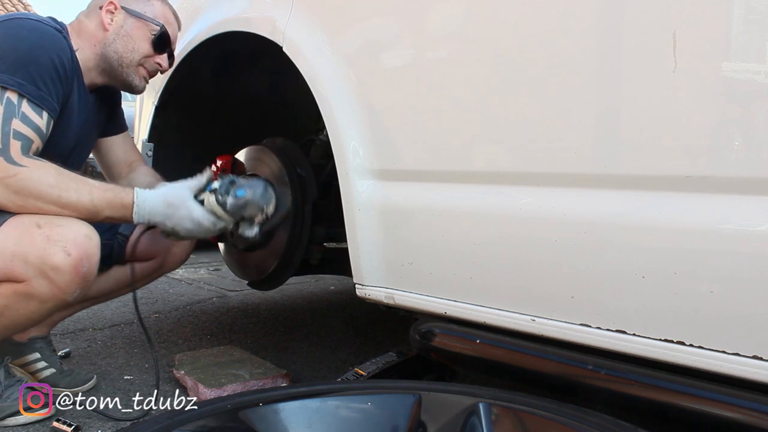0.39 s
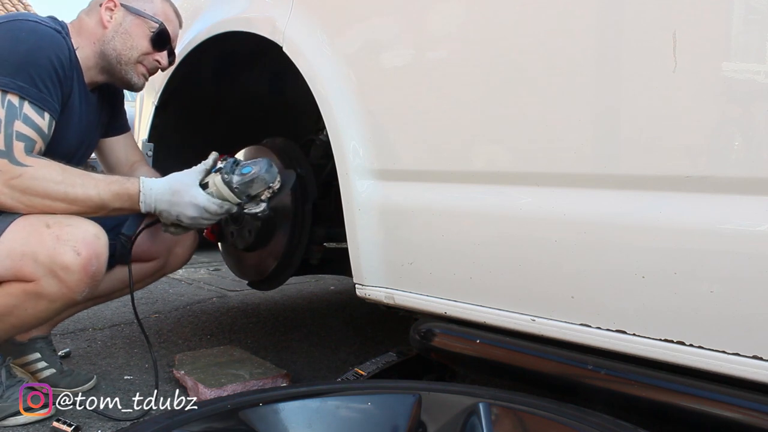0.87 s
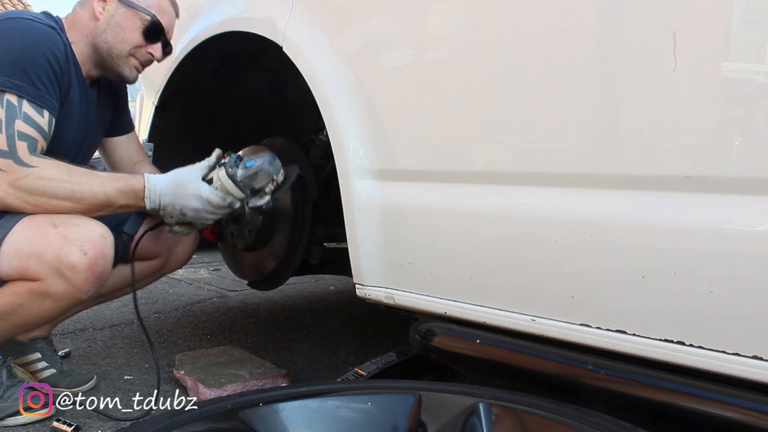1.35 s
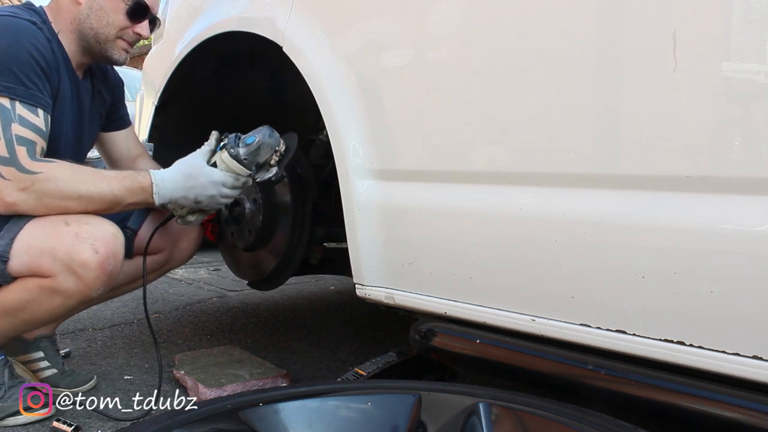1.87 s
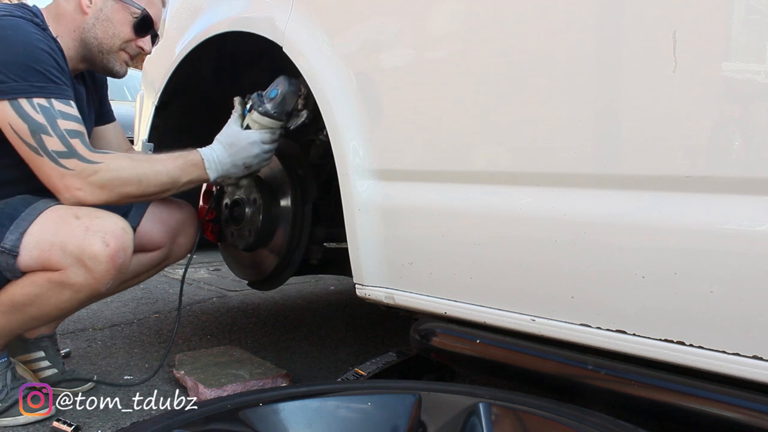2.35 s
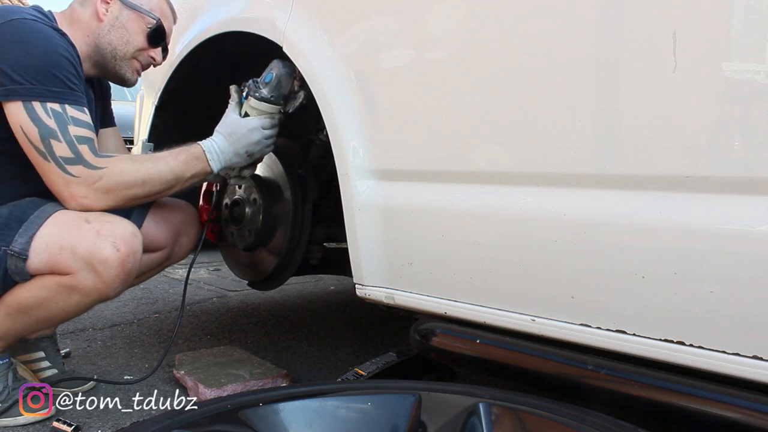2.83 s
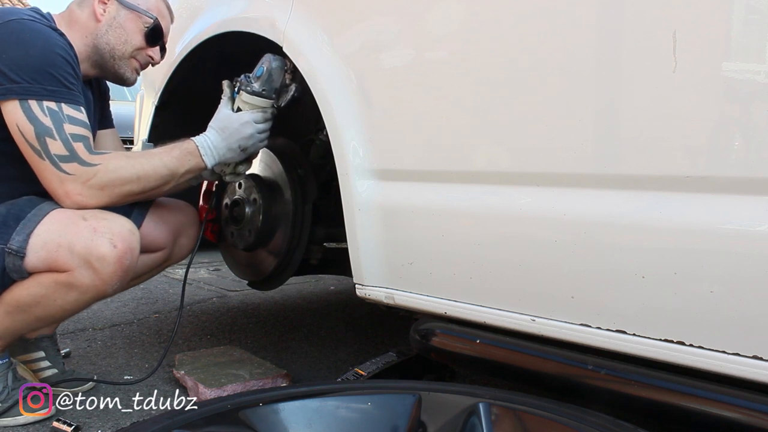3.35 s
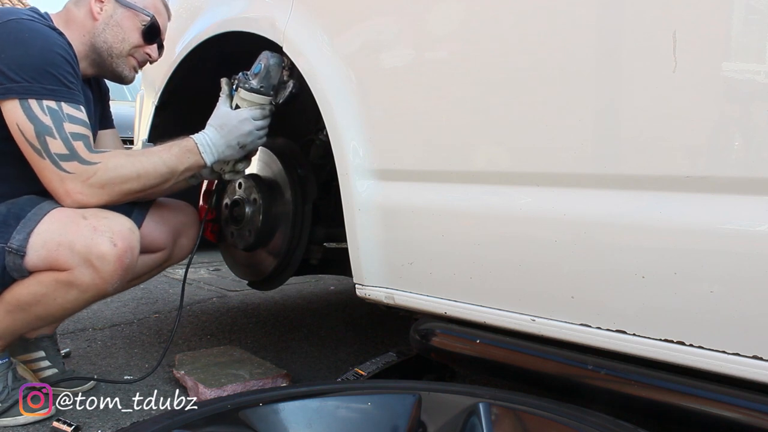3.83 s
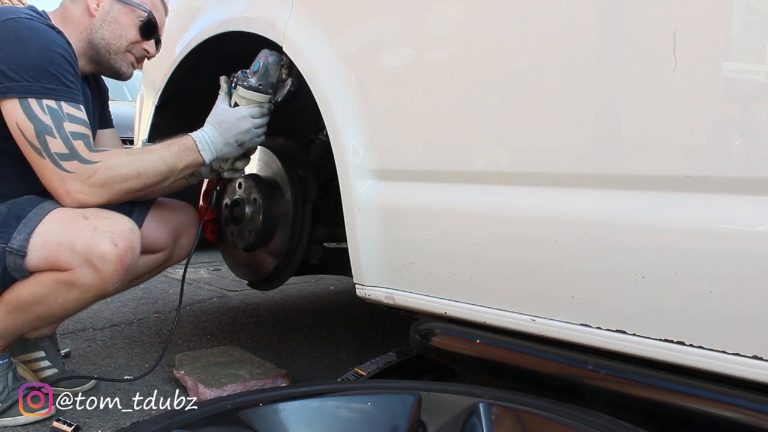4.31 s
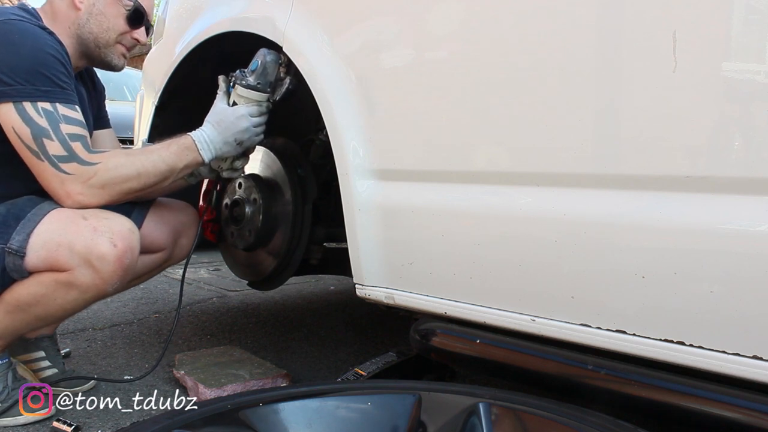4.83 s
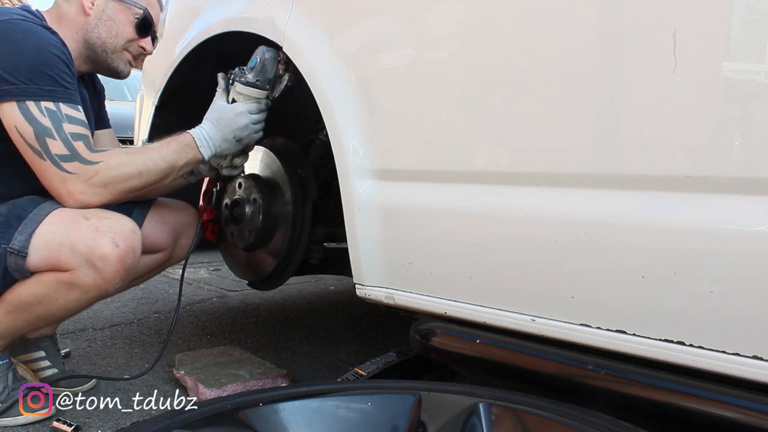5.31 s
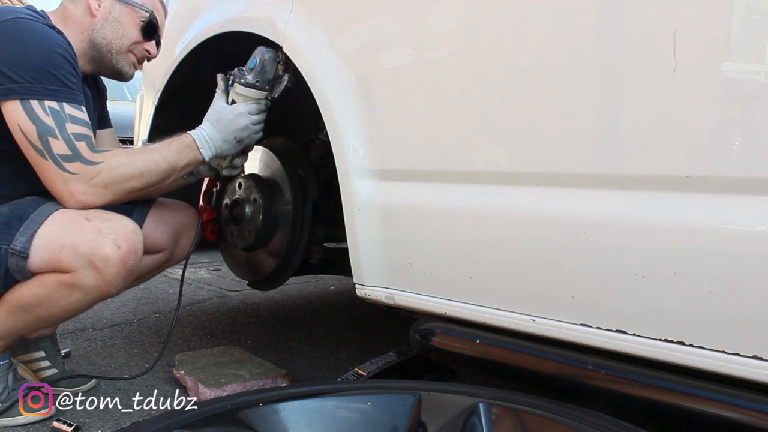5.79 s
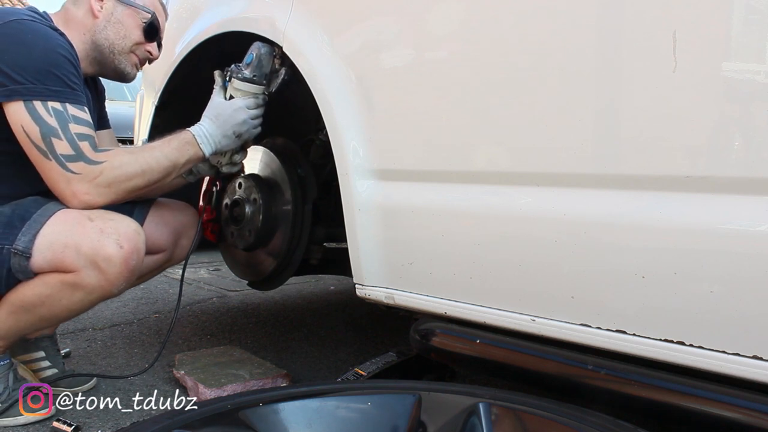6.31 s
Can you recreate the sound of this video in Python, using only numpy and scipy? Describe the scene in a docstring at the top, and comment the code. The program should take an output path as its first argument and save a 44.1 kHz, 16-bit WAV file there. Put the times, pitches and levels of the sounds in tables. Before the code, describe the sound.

A corded angle grinder, close and outdoors, begins already slowing, its gears rattling and metal guard ringing. It is switched on again, the whine and airy roar climbing fast to full speed. Then the disc bites into plastic wheel-arch lining: a harsh, steady scrape with gritty hiss and a hollow drumming buzz lasting to the end. Low wind gusts thump the microphone throughout.

```python
"""An angle grinder outdoors coasts down, its gears rattling and its steel guard ringing as slack teeth collide.
It is switched on at 1.59 s and winds up: tones locked to the shaft turns climb, and fan noise grows with speed.
From 3.42 s its disc bites into the plastic lining of a wheel arch: shaped noise scrapes, grit sprays and
the panel drums at multiples of the disc turns. Throughout, wind gusts buffet the microphone as low noise
and the loudest peaks overload it."""
import sys
import numpy as np
from scipy import signal
from scipy.fft import rfft, irfft, next_fast_len
from scipy.io import wavfile
from scipy.ndimage import uniform_filter1d, map_coordinates

SR = 44100
rng = np.random.default_rng(int(sys.argv[2]) if len(sys.argv) > 2 else 0)


def to_wav(s):
    """Save 16-bit WAV."""
    ch = np.atleast_2d(s).T  # columns
    pcm = np.round(np.clip(ch, -1, 1) * 32767)  # PCM
    wavfile.write(sys.argv[1], SR, pcm.astype(np.int16))


def natural_amplitude(level_db):
    """Convert a level in decibels to a linear amplitude factor, elementwise."""
    exponent = np.asarray(level_db, float) / 20
    return 10 ** exponent


N = 294147
T = np.arange(N) / SR  # time of each sample in seconds

CROWN_TEETH, PINION_TEETH = 37, 12  # bevel gears: crown on the disc shaft, pinion on the motor shaft
FULL_HZ = 5800  # gear mesh frequency taken as full speed
SWITCH_ON_S, TOUCH_S = 1.59, 3.42
# Brief dips of the clatter, followed in part by the fan noise.
# Each row: middle in seconds, half length in seconds, change in dB.
LULLS = [(.35, 0.086, -5.5), (.64, .03, -2.5), (.74, .03, -1.5), (.94, 0.037, -5.5), (1.51, 0.026, -1),
         (2.47, 0.072, -0.5)]


def unit(x):
    """Normalisation by mean power: scale to rms 1."""
    return x / np.sqrt(np.mean(x ** 2) + 1e-20)


def curves(rows):
    """Linear interpolation in time: one value per sample for each column after the time."""
    s, *cols = np.transpose(rows)
    return [np.interp(T, s, c) for c in cols]


def wobble(rate):
    """Band-limited random modulation: a smooth curve through normal random knots, rate knots a second."""
    at = np.arange(0, N + 16, 16)
    knots = rng.standard_normal(int(N * rate / SR) + 4)
    return np.interp(np.arange(N), at, map_coordinates(knots, [at * rate / SR]))


def swells(rows):
    """Superposed level envelopes: flat-topped rises, rows of (middle s, half length s, dB)."""
    t = np.arange(0, N + 64, 64) / SR
    total_db = sum((db * np.exp(-np.abs((t - s) / half) ** 3) for s, half, db in rows), 0 * t)
    return np.interp(T, t, total_db)


def after(s, rise_s):
    """Linear onset: 0 before the moment s, then rising to 1."""
    return np.clip((T - s) / rise_s, 0, 1)


def coloured(x, spectrum, ring=0):
    """Linear filtering: x through (Hz, dB) points and, by the share ring, the guard's resonances; rms 1."""
    # Resonances of the steel guard and housing.
    # Each row: centre in Hz, bandwidth in Hz, gain in dB before the share ring.
    guard_modes = [(1854, 127, 4.5), (2100, 81, 1), (2290, 70, -6), (2860, 130, -11.5), (3466, 105, -0.5),
                   (4030, 67, -8), (4250, 33, -1), (4630, 37, 10), (5088, 56, 12.5), (5630, 360, 3.5),
                   (6160, 150, -3), (7320, 66, 5), (10970, 240, 5.5)]
    m = next_fast_len(N + 8192)
    hz = np.fft.rfftfreq(m, 1 / SR)
    f, db = np.transpose(spectrum)
    modes = 0
    if ring:
        modes = sum(natural_amplitude(gain_db) * 1j * hz * width / (centre * centre - hz * hz + 1j * hz * width)
                    for centre, width, gain_db in guard_modes)
    shape = natural_amplitude(np.interp(np.log(hz + 1), np.log(f + 1), db))
    return unit(irfft(rfft(x, m) * shape * (1 + ring * modes), m)[:N])


def patchy(patchy_db):
    """Non-stationary noise: white noise whose gain drifts in small patches of time and frequency."""
    z = signal.stft(rng.standard_normal(N + 512), nperseg=512)[2]
    field = uniform_filter1d(rng.standard_normal(z.shape), size=6, axis=0)  # across frequency
    field = uniform_filter1d(field, size=10, axis=1)  # across time
    return unit(signal.istft(z * natural_amplitude(patchy_db * unit(field)), nperseg=512)[1][:N])


def mesh_hz():
    """Gear kinematics: the mesh frequency is the number of teeth meeting per second."""
    # The tool coasts, is switched on, winds up, then sags and recovers under load.
    # Each row: time in seconds, gear mesh frequency in Hz.
    speed_curve = [(0, 2030), (.45, 1814), (.65, 1584), (.86, 1281), (1.05, 1186), (1.55, 900),
                   (1.95, 1710), (2.33, 2898), (2.59, 3648), (2.85, 4310), (3.03, 4690), (3.3, 5214),
                   (3.53, 5510), (3.68, 5566), (3.89, 5708), (4.35, 5720), (4.7, 5810), (4.94, 5867),
                   (5.08, 5790), (5.38, 5657), (5.62, 5640), (5.94, 5786), (6.67, 5748)]
    return curves(speed_curve)[0]


def disc_turns():
    """Phase as the integral of frequency: turns of the disc so far, one per round of crown teeth."""
    return np.cumsum(mesh_hz()) / CROWN_TEETH / SR


def motor_turns():
    """Gear ratio: the motor turns faster than the disc by the ratio of tooth counts."""
    return disc_turns() * CROWN_TEETH / PINION_TEETH


def spell_db(order):
    """Order tracking: extra level of one multiple of disc turns while it sings out."""
    # Spells in which one gear or disc tone sings out under load.
    # Each row: middle in seconds, half length in seconds, multiple of disc turns, rise in dB.
    spells = [(3.677, .08, 37, 5), (4.279, 0.2, 37, 8), (4.9, 0.32, 37, 8.5), (5.97, 0.11, 37, 10),
              (6.39, 0.35, 74, 5), (3.85, .3, 74, 3), (4.5, 0.13, 74, 7), (5.08, .08, 74, 5),
              (3.93, .36, 3, 11), (4.96, 0.23, 3, 4), (6.02, .12, 3, 9), (6.62, 0.09, 3, 2),
              (4.08, .27, 4, 15.5), (5.1, 0.23, 4, 14), (5.744, 0.14, 4, 12), (6.39, 0.44, 4, 17.5),
              (3.9, .33, 5, 9), (4.59, 0.29, 5, 13), (5.03, 0.24, 5, 5), (5.402, 0.15, 5, 10.5),
              (5.722, 0.2, 5, 13)]
    return swells([(s, half, db) for s, half, k, db in spells if round(k) == order])


def gear_whine():
    """Gear mesh harmonics: tones at multiples of the mesh frequency, weighted by how the housing radiates."""
    # How well the housing radiates a gear tone. Each row: frequency in Hz, level in dB.
    radiation = [(900, -60), (1500, -42), (1900, -36), (2500, -28.5), (3200, -27), (3650, -33), (4050, -31),
                 (4400, -20), (4720, -40), (5050, -23), (5750, -26), (6700, -23), (7400, -26), (8600, -7),
                 (9400, -12.5), (10500, -19), (11500, -19.5), (13200, -16), (14000, -26), (15000, -18)]
    # The mesh tone and its 2nd and 3rd multiples.
    # Each row: level in dB added to the radiation, mesh frequency in Hz from which it sounds.
    multiples = [(0, 1400), (-17, 3000), (-30, 3500)]
    peak_hz, half_hz, peak_db = 1440, 300, -47.5  # coasting resonance; 6 dB down at half_hz from its peak
    turns, mesh = disc_turns(), mesh_hz()
    slack = np.clip(1 - mesh / FULL_HZ / .85, 0, 1)  # slow gears run unevenly, so their tones smear
    uneven = 0.25 * wobble(60) + 2.8 * slack * wobble(250)
    f, body_db = np.transpose(radiation)
    driven = 0
    for k, (db, from_hz) in enumerate(multiples, start=1):
        level_db = db + np.interp(k * mesh, f, body_db, right=-120)
        level_db = level_db + spell_db(k * CROWN_TEETH) + k * 1.15 * wobble(20)
        tone = np.sin(2 * np.pi * k * CROWN_TEETH * turns + uneven / k ** 2)
        driven = driven + natural_amplitude(level_db) * tone * np.clip((mesh - from_hz) / 250, 0, 1)
    # without power the mesh tone sounds only near one resonance
    free_db = peak_db - 6 * ((mesh - peak_hz) / half_hz) ** 2 + 3 * wobble(15.4)
    free = natural_amplitude(free_db) * np.sin(2 * np.pi * CROWN_TEETH * turns + 0.53 * wobble(59.2))
    powered = after(SWITCH_ON_S, rise_s=0.35)
    return np.sqrt(2) * (powered * driven + (powered == 0) * free)


def disc_hum():
    """Rotational harmonics: the loose disc hums at multiples of its turns, fading from the start."""
    # Each row: multiple of disc turns, rms level at the start in dB, fading in dB per second.
    hum_orders = [(5.5, -50.5, 31), (8, -57, 5.5), (16, -43, 40)]
    turns = disc_turns()
    return np.sqrt(2) * sum(natural_amplitude(db - fade_db * T + 4.8 * wobble(8.97))
                            * np.sin(2 * np.pi * k * turns + .6 * wobble(40.1))
                            for k, db, fade_db in hum_orders)


def clatter_db():
    """Impact level law: clatter grows with speed and pull until the teeth seat and stay in contact."""
    full_db, db_per_decade = -16.5, 20.5  # at full speed before seating and pull; per decade of speed
    pulling_db = 5  # extra while the motor pulls
    seated_hz, seating_db_per_khz = 2950, 9  # the clatter falls above this mesh frequency
    mesh = mesh_hz()
    law_db = full_db + db_per_decade * np.log10(mesh / FULL_HZ) + pulling_db * after(SWITCH_ON_S, rise_s=0.49)
    seating_db = seating_db_per_khz * np.clip(mesh - seated_hz, 0, None) / 1000
    return law_db - seating_db + swells(LULLS) + jolt_db()


def jolt_db():
    """Exponential decay: a last jolt of the tool dies away at the start."""
    return 7.5 * np.exp(-T / 0.035)


def rattle():
    """Impact excitation: unloaded teeth bounce through their backlash in clumps and ring the guard."""
    # The hardest tooth blows. Each row: start in seconds, relative strength in dB.
    knocks = [(0.0882, -19), (0.1585, -20), (0.384, -10), (1.0874, -9), (1.1283, -9), (1.2201, -12),
              (1.2426, -22), (1.3988, -17), (1.8432, -14), (1.9238, -9), (2.0607, -7), (2.1435, -6),
              (2.2827, -14), (2.3825, -18)]
    # Sound of the gear head. Each row: frequency in Hz, relative spectral density in dB.
    head = [(120, -57), (200, -30), (283, -16), (575, -24.5), (843, -6.5), (1280, -18), (1460, -15),
            (1880, -4.5), (3560, -2), (4270, -5.5), (5030, -5.5), (5920, -6.5), (6730, -21), (14200, -29),
            (15600, -33)]
    # The guard rings out. Each row: middle in seconds, half length in seconds, change in dB.
    rings = [(.44, .07, 8), (.64, 0.032, 14), (.76, 0.075, 18.5), (.89, 0.055, 14), (1.27, 0.23, 13.5),
             (2.15, 0.093, 5), (2.8, .3, -6)]
    ping_hz, ping_t60 = 5140, 0.092  # the guard's clearest mode: Hz, seconds to fall by 60 dB
    level = natural_amplitude(clatter_db())
    ring_level = level * natural_amplitude(-10.5 + swells(rings))

    clump = natural_amplitude(2.2 * np.cos(2 * np.pi * disc_turns()) + 1.56 * wobble(60))  # about once a disc turn
    blows = (rng.random(N) < .15) * rng.standard_normal(N)
    # a high tooth strikes once a motor turn
    strikes = np.abs(np.diff(np.floor(motor_turns() + .08 * wobble(30)), prepend=0))
    ticks = unit(strikes * rng.standard_normal(N))
    drive = unit(clump * (.6 * unit(blows) + patchy(patchy_db=2.5)) + .4 * ticks)

    burst = np.exp(-np.arange(400) / (.003 * SR))
    for s, db in knocks:
        start = round(s * SR)
        knock = rng.standard_normal(len(burst)) * burst
        # divided by the clatter level, which multiplies the whole drive below
        drive[start:start + len(burst)] += natural_amplitude(db - 9) / level[start] * knock

    t = np.arange(SR // 8) / SR
    mode = natural_amplitude(-60 * t / ping_t60) * np.sin(2 * np.pi * ping_hz * t)
    guard = signal.fftconvolve(drive + 2.5 * ticks, mode)[:N]
    return level * coloured(drive, head, ring=0.87) + ring_level * unit(guard)


def fan():
    """Aerodynamic noise power law: air and brush roar grows with speed and pulses with the mains current."""
    # Sound of free running. Each row: frequency in Hz, relative spectral density in dB.
    air = [(88, -52), (150, -24), (263, -24.5), (314, -19), (669, -6), (968, -8.5), (1070, -2.5),
           (1870, -7), (2410, -5.5), (2820, 2), (3770, -3.5), (4400, 1), (7580, -17), (8860, -17.5),
           (15600, -24.5)]
    level_db = -10.5 + 37.5 * np.log10(mesh_hz() / FULL_HZ)  # dB at full speed; dB per decade of speed
    level_db = level_db - 6 * after(TOUCH_S, rise_s=0.12)  # shaded once inside the arch
    level_db = level_db + 0.62 * jolt_db() + 0.35 * swells(LULLS)
    mains = 1 + 0.13 * np.sin(2 * np.pi * 100 * T)
    return natural_amplitude(level_db + 0.63 * wobble(20)) * mains * coloured(patchy(patchy_db=1.0), air, ring=0.48)


def wind():
    """Turbulent pressure on the microphone: lumpy low noise in two bands, thud and flutter, rising in gusts."""
    # Spectra of thud and flutter. Each row: frequency in Hz, relative spectral density in dB.
    buffet = [
        [(12, -21), (25, -2.5), (60, -4), (85, -26), (200, -120)],
        [(40, -51), (70, 2), (120, -5.5), (150, -11.5), (200, -26), (500, -120)],
    ]
    # Each row: middle in seconds, half length in seconds, thud rise in dB, flutter rise in dB.
    gust_rows = [(0.11, 0.29, 12, 22.5), (0.478, 0.11, 11, 17), (0.799, 0.11, 3, 10), (1.543, .15, 1, 15.5),
                 (1.97, 0.078, 13, 13), (2.503, 0.21, 3, 18.5), (3.23, 0.12, 1, 15), (3.62, .06, 5, 8),
                 (4.402, 0.26, 11, 24), (4.946, 0.21, 14, 17.5), (5.55, 0.44, 8.5, 19), (6.2, 0.28, 1, 14)]
    total = 0
    for k, calm_db in enumerate([-47.5, -55.5]):  # rms level between gusts
        gust_db = swells([(s, half, rise[k]) for s, half, *rise in gust_rows])
        lumpy = natural_amplitude(0.89 * wobble(13)) * coloured(rng.standard_normal(N), buffet[k])
        total = total + natural_amplitude(calm_db + gust_db) * unit(lumpy)
    return total


def motor_tones():
    """Rotational harmonics: the motor's own orders, growing with speed."""
    # Each row: multiple of motor turns, rms level at full speed in dB.
    motor_orders = [(1, -49), (2, -42), (3, -42), (13, -42)]
    turns = motor_turns()
    tones = sum(natural_amplitude(db + 2.5 * wobble(6)) * np.sin(2 * np.pi * k * turns) for k, db in motor_orders)
    return np.sqrt(2) * np.clip(2 * mesh_hz() / FULL_HZ - .8, 0, 1) * tones


def scraping():
    """Friction noise: the disc scrapes the liner, and its worn face partly repeats with each turn."""
    # Spectra of the scraped plastic, the flying grit and the drumming arch.
    # Each row: frequency in Hz, relative spectral density in dB.
    liner, grit_spectrum, panel_spectrum = [(590, -34), (1000, -25), (1250, -7), (1460, -6), (1800, -6.5),
                                            (2360, -6), (2870, 3.5), (3660, -3.5), (3950, 2.5), (4840, -5),
                                            (5220, -2.5), (6180, -12), (7500, -19), (9750, -45),
                                            (16500, -120)], [(3820, -39), (6500, -2), (7520, -8), (8270, 2.5),
                                                           (9030, -3.5), (10400, -3.5), (11500, -3),
                                                           (14600, -8.5), (15600, -10.5)], [(94, -62), (160, -20),
                                                                         (328, -19.5), (471, -4.5),
                                                                         (553, -4), (617, -3), (787, -11.5),
                                                                         (864, -14), (932, -8.5),
                                                                         (1200, -4), (1560, -35),
                                                                         (2640, -120)]
    # Hand pressure. Each row: time in seconds, scrape level in dB.
    pressure = [(3.42, -14.5), (3.62, -12), (3.91, -11.5), (4.35, -11.5), (5.03, -10.5), (6.67, -10.5)]
    wear = T * 3
    face = rng.standard_normal((int(wear[-1]) + 2, 256))  # rows: the face wears on; columns: angle
    repeat = unit(map_coordinates(face, [wear, disc_turns() % 1 * 256], order=1, mode="grid-wrap"))
    scrape = coloured(patchy(patchy_db=0.7) + 0.29 * repeat, liner, ring=0.36)
    # grit and panel levels are in dB relative to the scrape
    first_spray_db = 6 * np.exp(-((T - 3.44) / 0.021) ** 2)  # loose dirt flies at first touch
    grit_level = natural_amplitude(-11.5 + 0.57 * wobble(9) + first_spray_db)
    grit = grit_level * coloured(patchy(patchy_db=.9) + 0.5 * repeat, grit_spectrum)
    panel_level = natural_amplitude(-10 + 0.7 * wobble(9))
    panel = panel_level * coloured(patchy(patchy_db=0.7) + 0.48 * repeat, panel_spectrum)
    press = after(TOUCH_S - .02, rise_s=0.028) * natural_amplitude(curves(pressure)[0] + 0.53 * wobble(30))
    return press * (scrape + grit + panel)


def drumming():
    """Forced vibration: the wobble of the biting disc drives the panel at multiples of its turns."""
    # Low orders. Each row: multiple of disc turns, rms level between spells in dB.
    drum_orders = [(3, -36), (4, -36), (5, -34.5)]
    # The other orders, steadier or following the bite.
    # Each row: multiple of disc turns, rms level in dB before the bite is added,
    # how far it follows the bite from 0 to 1.
    chatter_orders = [(1, -53.5, 0.54), (6, -37, 0.2), (8, -43, 0), (9, -42.5, 0), (10, -38, 0.94),
                      (12, -38, 1), (13, -50, 0.7), (14, -41, 1), (15, -35, 0)]
    # Fresh edge under the disc. Each row: time in seconds, bite in dB before each order's share.
    bite = [(3.5, 6), (3.65, 12.5), (4.0, 2.5), (4.9, 7), (5.2, 5), (6.67, -12)]
    turns = disc_turns()
    drum = sum(natural_amplitude(db + spell_db(round(k)) + 1.75 * wobble(20))
               * np.sin(2 * np.pi * round(k) * turns + 0.31 * wobble(40)) for k, db in drum_orders)
    bite_db = curves(bite)[0]
    chatter = sum(natural_amplitude(db + share * bite_db + 3.1 * wobble(7))
                  * np.sin(2 * np.pi * k * turns + .5 * wobble(30)) for k, db, share in chatter_orders)
    return np.sqrt(2) * after(TOUCH_S, rise_s=0.21) * (drum + chatter)


def scene():
    """Superposition: all sources add at one microphone, heard alike in both channels."""
    tool = gear_whine() + disc_hum() + rattle() + fan() + motor_tones()
    mix = tool + wind() + scraping() + drumming()
    return np.tile(mix, (2, 1))


def low_pass(x):
    """Removes everything above the highest recorded frequency."""
    return signal.sosfilt(signal.butter(12, 15710, fs=SR, output="sos"), x)


def record(dry):
    """Saturation: the microphone overloads, bending the loudest peaks towards a ceiling."""
    overloaded = dry / (1 + np.abs(dry / 1.02) ** 12) ** (1 / 12)
    return low_pass(overloaded)


dry = scene()
out = record(dry)
to_wav(out)
```